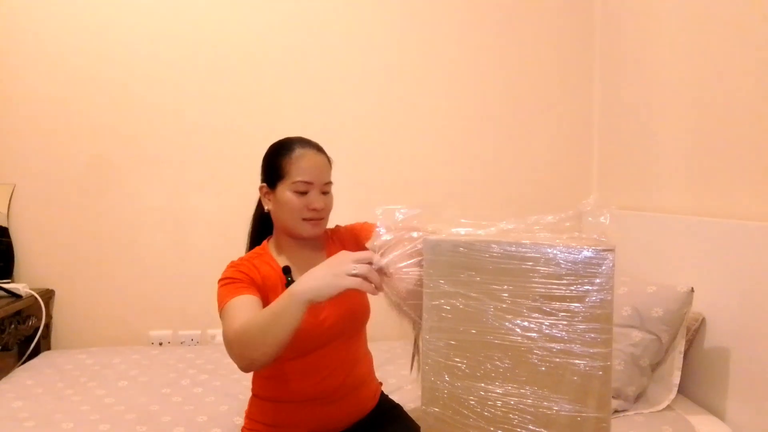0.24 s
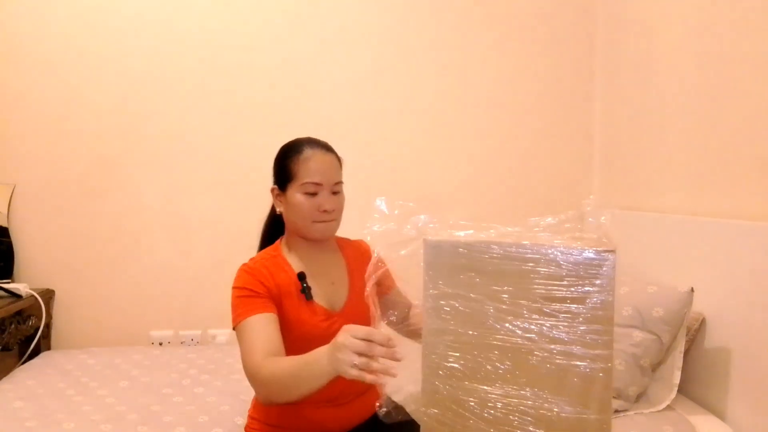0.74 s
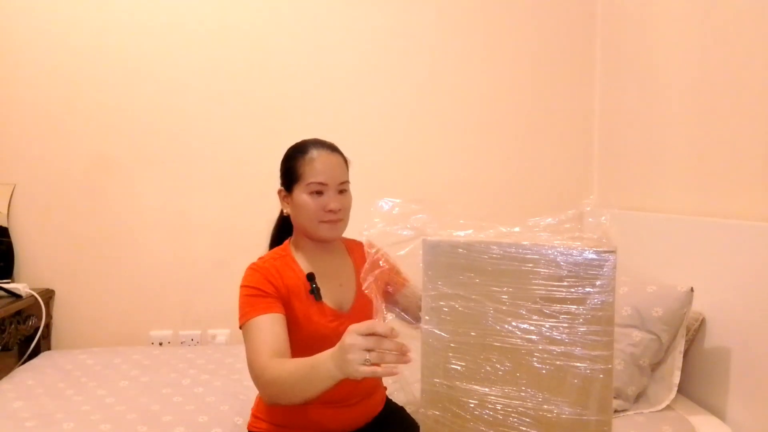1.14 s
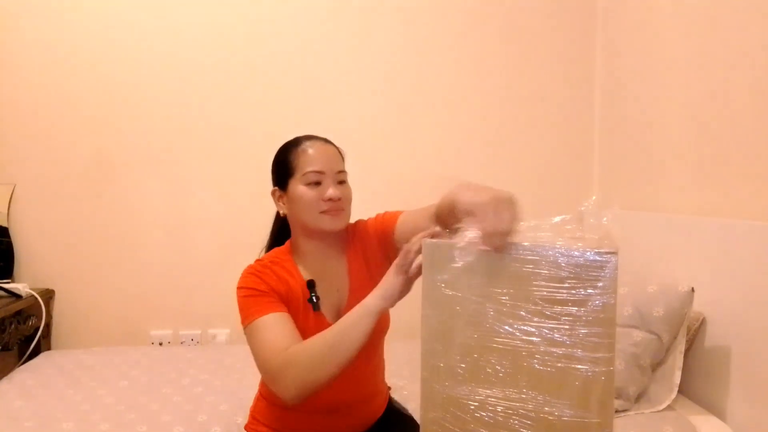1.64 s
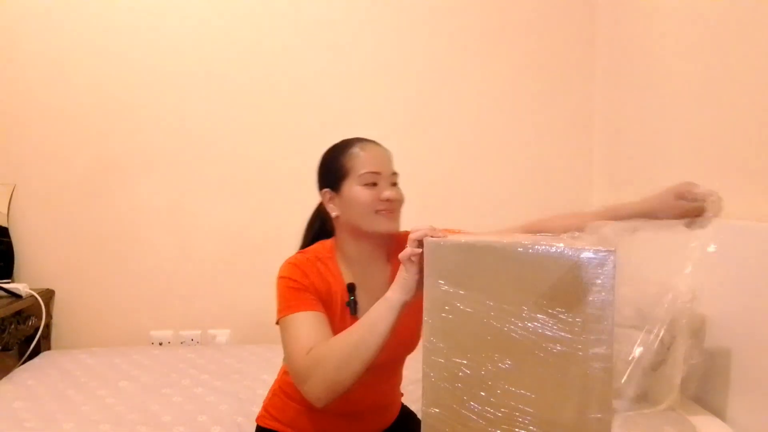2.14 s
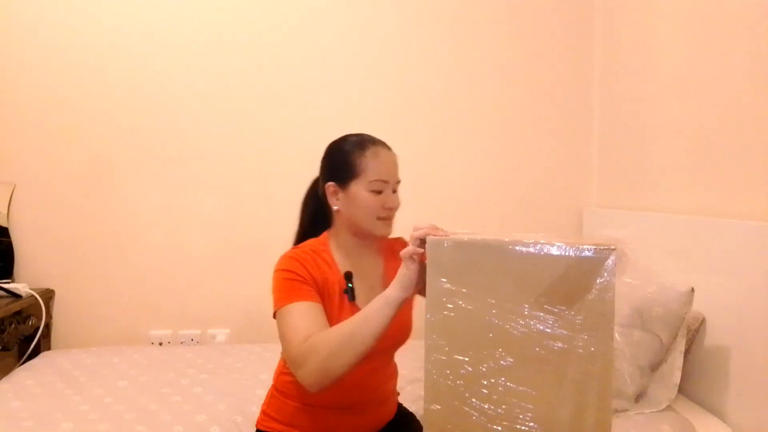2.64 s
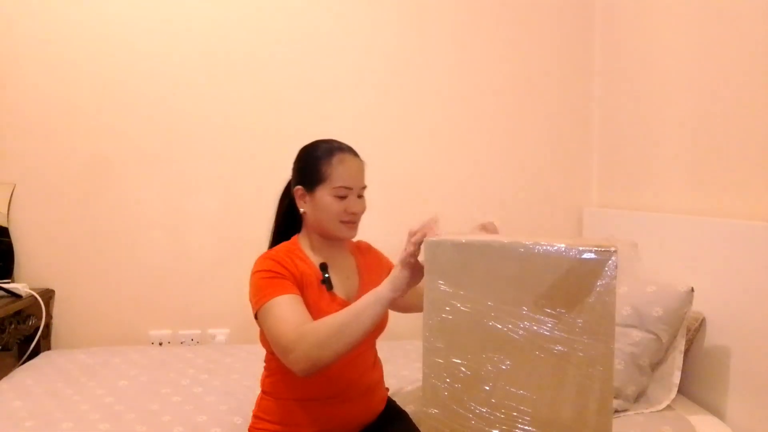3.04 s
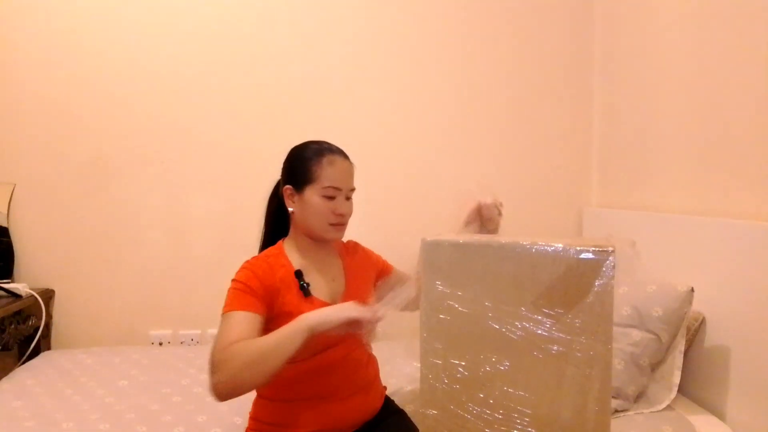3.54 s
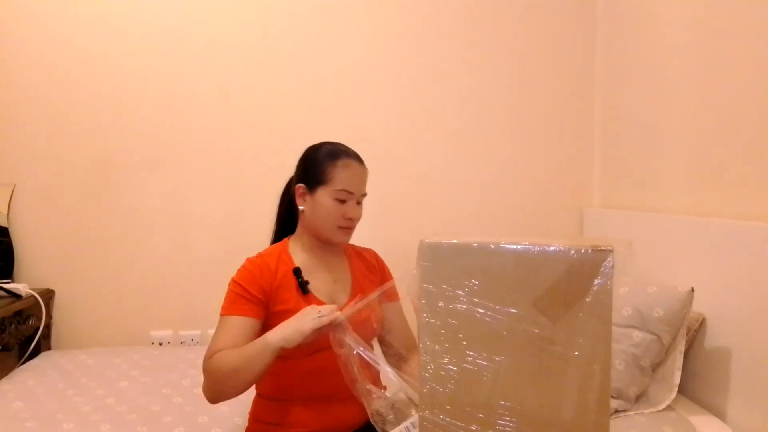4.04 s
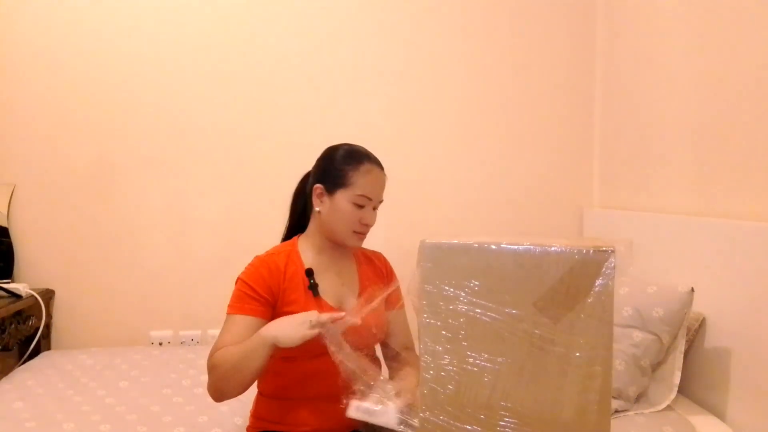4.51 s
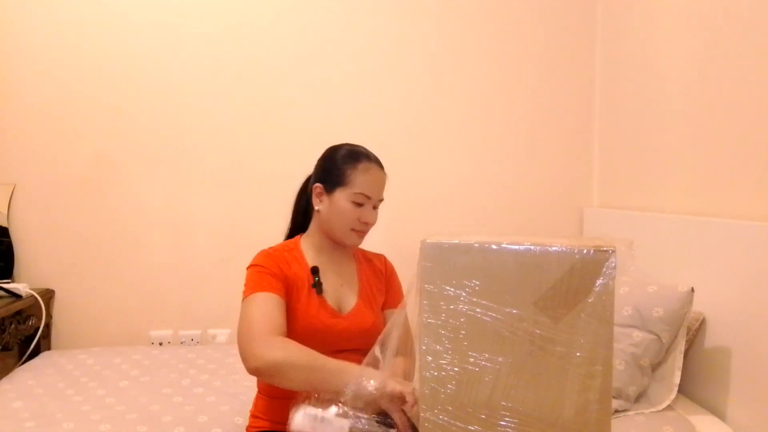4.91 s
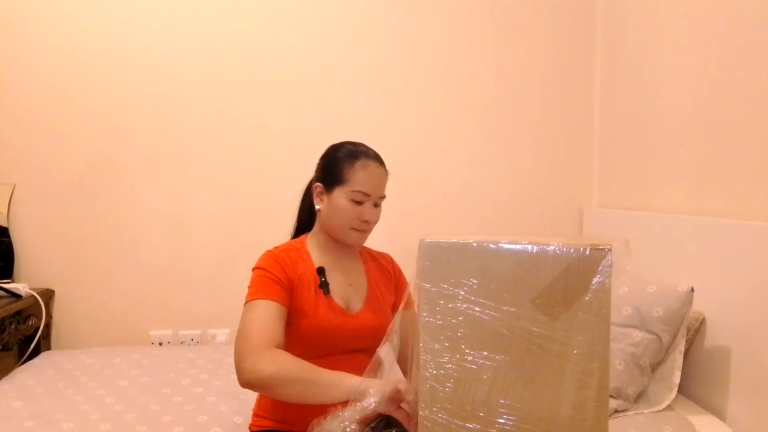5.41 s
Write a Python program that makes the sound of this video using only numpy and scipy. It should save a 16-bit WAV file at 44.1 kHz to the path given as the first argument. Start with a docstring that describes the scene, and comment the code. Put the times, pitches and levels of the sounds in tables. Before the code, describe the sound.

Close, dry crinkling of thin stretch wrap in irregular bursts, with one long rustling peel and lighter gathering rustles in a quiet small bedroom.

```python
"""Sharp crackling comes first, from short tugs at stretch wrap on a cardboard box in a small bedroom.
One long peel follows, then the loose film is gathered and pushed down beside the box.
Random noise grains make the tiny creases, filtered by the resonances of the sheet in each grip.
Big creases snap and ring, taut film drives the box like a drum skin, and hands knock on the cardboard.
Reflections and a faint hush place it all in the room, heard by a close clip-on mono microphone."""
import sys
import numpy as np
from scipy import signal
from scipy.fft import rfft, irfft, next_fast_len
from scipy.io import wavfile
from scipy.ndimage import uniform_filter1d

SR = 44100
rng = np.random.default_rng(int(sys.argv[2]) if len(sys.argv) > 2 else 0)


def persist_wave(psi):
    """Save psi, clipped to +-1, as 16-bit WAV."""
    counts = np.round(np.clip(psi, -1, 1) * 32767).astype(np.int16)
    wavfile.write(sys.argv[1], SR, np.atleast_2d(counts).T)


N = 249853
TIME = np.arange(N) / SR  # seconds

# Resonances of the plastic sheet, one table for each way of holding it: f/Hz, relative level/dB
LIFTED = [(24, -53.5), (40, -32.5), (117, -25.5), (158, -22.5), (213, -26), (253, -21.5), (509, -19.5),
          (1160, -5), (1640, -6.5), (4130, -4.5), (6010, -3), (8730, 8), (14000, -4), (15500, -12)]
TUGGED = [(24, -45.5), (40, -31), (154, -9), (224, -14), (273, -27.5), (350, -15.5), (484, -12), (670, 4.5),
          (740, -0.5), (1190, 1), (1380, -3.5), (2770, 0.5), (4680, -14), (9180, 14), (15500, -6.5)]
DANGLING = [(59, -62), (100, -29), (258, -50), (682, -28), (727, -12), (998, -3.5), (1340, -16),
            (1520, -16.5), (2690, -11), (3120, -21), (6120, -20.5), (9540, 1.5), (12800, -28), (14500, -11),
            (15500, -47)]
STRETCHED = [(24, -64.5), (40, -28.5), (103, -16.5), (183, -12.5), (438, -9), (704, 0.5), (1280, -11.5),
             (1410, -16), (2710, -15.5), (3220, -19), (5580, -15.5), (6810, -3.5), (7910, -12.5),
             (9180, -4), (15500, -22.5)]
PEELING = [(24, -41), (40, -28.5), (114, -25.5), (170, -18), (535, -6.5), (973, -0.5), (2770, -7.5),
           (7160, -7), (7910, -13), (9410, -1), (11800, -14), (14400, -18.5), (15500, -15)]
TEARING_FREE = [(24, -50.5), (40, -23), (136, -17), (213, -12.5), (472, -10), (562, -5), (653, 2), (998, 5),
                (2160, -11), (2710, -5), (4680, -9), (6640, -1.5), (9650, -2.5), (15500, -19)]
FLICKED = [(100, -33.5), (330, -21), (550, -29), (920, -10), (1200, -21), (1900, -18.5), (2500, -8.5),
           (3200, -5.5), (3750, -24), (4500, -11), (5100, 0.5), (6000, -1), (7300, 10.5), (7900, -4),
           (10000, 6.5), (12500, -8), (14000, 1), (15500, -23)]
SLACK = [(59, -82.5), (100, -54), (248, -44), (601, -14), (712, -26), (936, -15.5), (1400, -25.5),
         (2130, 8), (2470, 6.5), (3610, 3.5), (5400, 4), (6660, -18.5), (7560, -10), (10200, -6.5),
         (15500, -21)]
SHAKEN = [(59, -42), (100, -20), (258, -16.5), (457, -8.5), (576, -21.5), (727, -8), (1230, -19),
          (1620, -2), (1840, -11), (2630, 1), (3690, -3), (5070, 3), (6120, -8.5), (10600, -3),
          (15500, -12)]
FOLDED = [(59, -80.5), (100, -59.5), (808, -6.5), (1130, -4), (1880, 2), (3250, -16.5), (3930, -3),
          (4460, -26.5), (8230, -28), (9150, -31.5), (10200, -23.5), (14500, -43), (15500, -39.5)]
CRUMPLED = [(35, -58.5), (60, -29.5), (351, -17.5), (385, -16), (509, -13), (721, -14), (1200, -11.5),
            (1450, -5.5), (1630, -9), (2200, -5), (3270, -9), (4220, -7), (7900, -4), (9740, 1),
            (15500, -16.5)]
PRESSED = [(35, -70), (60, -41), (175, -6), (546, -29), (738, -9), (1420, -17), (1740, -36), (2530, -8.5),
           (3930, -17.5), (4850, 0.5), (6120, -14), (7200, -0.5), (12300, -9.5), (14500, -10), (15500, -11)]
# Grips, one after another: start t/s, resonances, creases per second [1/s],
# spread of crease sizes [dB], box level/dB relative to the sheet that drives it
GRIPS = [(0, LIFTED, 2700, 3, -19.5), (.7, TUGGED, 2600, 0.5, -9), (.89, DANGLING, 1470, 5, -20.5),
         (1.311, TUGGED, 1200, 1.5, -27.5), (1.45, STRETCHED, 2500, 3.5, -14),
         (1.701, PEELING, 3600, 0.5, -10.5), (2.52, TEARING_FREE, 3700, 2, -10.5),
         (3.2, FLICKED, 1600, 3.5, -8.5), (3.6, SLACK, 2600, 0, -15), (4.101, SHAKEN, 1900, 1.5, -4.5),
         (4.57, FOLDED, 2250, 3.5, -20), (4.7, CRUMPLED, 2700, 2, -11.5), (5.17, PRESSED, 1700, 3, -15)]
# Pitch ranges of fine creases, broad wrinkles, taut sheet and box: low edge f/Hz, high edge f/Hz
ZONES_HZ = [(6000, 20000), (1600, 6000), (450, 1600), (15, 450)]


def rustle(motion, regrip_s=.02):
    """Creases sound through the held sheet; each scale of film follows the pull, the box the taut sheet."""
    fine, wrinkles, taut = motion * undb([-1, -.5, -1])[:, None]
    ends = [grip[0] for grip in GRIPS[1:]] + [N / SR + regrip_s]
    out = np.zeros(N)
    for (start, resonances, rate, spread_db, box_db), end in zip(GRIPS, ends):
        now = (TIME > start - regrip_s) & (TIME < end + regrip_s)
        t = TIME[now]
        # neighbouring grips crossfade at equal power
        to_edge_s = np.minimum(t - start, end - t)
        held = np.sqrt(np.clip(.5 + to_edge_s / (2 * regrip_s), 0, 1))
        sheet = colour(creases(len(t), rate, spread_db), resonances)
        sheet = tighten(folds(sheet), t)
        gains = fine[now], wrinkles[now], taut[now], taut[now] * undb(box_db)
        layers = [steady(zone(sheet, *edges)) * gain for edges, gain in zip(ZONES_HZ, gains)]
        add(out, t[0], held * sum(layers))
    return out


def creases(n, rate, spread_db, ring_s=0.0059, ring_cycles=2.2, own_db=3.5, even_s=0.042):
    """Creases buckle at random; each has its own size and favours some pitches, and low ones ring longer."""
    chance = rng.random((n, 2))
    at = np.flatnonzero(chance[:, 0] < rate / SR)
    size_db = -spread_db * np.log(chance[at, 1] + 1e-3)
    edges = np.geomspace(250, 16000, 10)  # Hz
    out = np.zeros(n)
    for lo, hi in zip([20, *edges[:-1]], edges):
        kicks = np.zeros(n)
        pitch_db = own_db * rng.standard_normal(n)[at]
        kicks[at] = undb(size_db + pitch_db) ** 2
        # each kick leaves energy that dies away
        keep = np.exp(-2 / (SR * (ring_s + ring_cycles / hi)))
        energy = signal.lfilter([1 - keep], [1, -keep], kicks) + 1e-9
        # the hand feeds in energy steadily: a big crease relieves its neighbours
        energy /= uniform_filter1d(energy, int(even_s * SR)) + 1e-9
        out += band(np.sqrt(energy) * rng.standard_normal(n), lo, hi, order=3)
    return out


def folds(x):
    """Nearby folds mirror the sound a moment later; as they move, the colour ripples."""
    t, out = TIME[:len(x)], x.copy()
    knots = np.arange(0, t[-1] + .3, .15)  # seconds
    for lag_s in (.0005, .0011, .0019):
        lag = lag_s * np.exp(np.interp(t, knots, .12 * rng.standard_normal(len(knots))))
        share = np.interp(t, knots, .22 * rng.standard_normal(len(knots)))
        out += share * np.interp(t - lag, t, x)
    return out


# Small patches of film that tighten and ring: start t/s, lasting t/s, f/Hz, width f/Hz, boost level/dB
PATCHES = [(.33, 0.35, 1090, 130, 5.5), (.62, .15, 1030, 110, 15), (.41, 0.2, 10100, 810, 11),
           (.62, 0.18, 7100, 480, 13), (.9, .41, 2740, 130, 11), (1.0, 0.26, 1890, 90, 13),
           (1.52, 0.18, 1150, 350, 8), (2.77, .39, 3030, 445, 0.5), (3.03, 0.11, 7520, 1500, 11),
           (3.62, 0.064, 14200, 1800, 12), (3.768, 0.086, 7500, 560, 13.5), (3.77, 0.048, 5150, 450, 9.5),
           (3.68, 0.062, 2230, 300, 7), (3.94, 0.17, 4200, 400, 9), (4.07, 0.23, 3240, 170, 18),
           (4.45, 0.18, 2680, 248, 11.5), (4.58, 0.069, 1900, 397, 7.5), (4.69, 0.13, 4350, 450, 10.5),
           (4.84, 0.072, 2300, 248, 7), (4.83, 0.12, 9900, 550, 9.5), (5.111, 0.073, 7500, 597, 13),
           (5.39, 0.11, 7150, 700, 5)]


def tighten(x, t, fade_s=0.011):
    """A tight patch lifts one resonance out of the creases that run through it."""
    out = x.copy()
    for start, lasting, hz, width, boost_db in PATCHES:
        taut = np.clip(np.minimum(t - start, start + lasting - t) / fade_s, 0, 1)
        if taut.any():
            resonance = signal.lfilter(*signal.iirpeak(hz, hz / width, fs=SR), x)
            out += taut * (undb(boost_db) - 1) * resonance
    return out


def zone(x, lo, hi):
    """One of several bands with soft edges; where neighbours meet they add up smoothly."""
    size = next_fast_len(len(x) + SR // 20)
    hz = np.arange(size // 2 + 1) * SR / size

    def below(edge):
        """Let through what lies below the edge."""
        return 1 / (1 + (hz / edge) ** 10)

    return irfft(rfft(x, size) * (below(hi) - below(lo)), size)[:len(x)]


def steady(x, span_s=0.066):
    """Even out the slow level to about rms 1 and keep the fast grain."""
    return x / np.sqrt(np.abs(uniform_filter1d(x ** 2, int(span_s * SR))) + 1e-20)


# Short tugs and squeezes: taut at t/s, rise t/s (time to climb 20 dB), held t/s,
# fine crackle level/dB, and relative to it: broad wrinkles level/dB, taut sheet level/dB
TUGS = [(0.0, .02, 0.032, -21.5, -7, -14.5), (.14, 0.075, 0.054, -18.5, -7, -14),
        (0.226, 0.025, .06, -20, -6, -11), (0.366, 0.12, 0.12, -22.5, -7, -8.5),
        (0.549, 0.12, 0.058, -35.5, -7, -8.5), (.725, 0.056, .03, -59.5, -15, -5),
        (0.791, 0.02, 0.018, -19.5, -5, -3.5), (0.924, 0.042, 0.0087, -41.5, -6.5, -21),
        (1.011, 0.018, 0.091, -47.5, -11.5, -15), (1.114, 0.012, 0.0081, -50.5, -3, -1),
        (1.36, 0.017, 0.017, -28, -9.5, -9), (1.516, 0.042, 0.05, -24.5, -6, -1.5),
        (1.57, 0.036, 0.088, -21.5, -4, -1), (3.3, .09, .04, -56.5, -3.5, -16.5),
        (3.356, 0.02, 0.065, -31, -6, -25), (3.451, 0.032, 0.098, -25.5, 2, -19.5),
        (3.645, 0.085, 0.041, -39, -3, -24.5), (3.72, 0.019, .11, -39.5, 4, -17),
        (3.93, 0.045, 0.073, -42.5, 8, -16), (4.114, 0.042, 0.036, -65.5, 9.5, 6),
        (4.2, .08, .045, -67.5, 4, -7), (4.305, 0.026, 0.019, -31, 4, -16),
        (4.365, 0.041, 0.024, -32.5, 5.5, -9.5), (4.44, .04, 0.043, -42.5, -2.5, -9.5),
        (4.601, 0.017, .05, -48.5, 15.5, 10.5), (4.64, .02, 0.042, -34.5, 3, -7.5),
        (4.713, .025, 0.028, -23, 0, -11.5), (4.817, 0.0066, 0.12, -18.5, 0, -12.5),
        (4.855, .04, .01, -10, -12.5, -19), (4.97, 0.066, 0.055, -36.5, 8, -6),
        (5.049, .03, .015, -29, 0, -12.5), (5.47, 0.048, .02, -29, -18, -21),
        (5.531, 0.029, 0.038, -19, -4, -15), (5.61, 0.014, 0.011, -29, 0, -16)]
# The long peel across the top of the box: t/s, fine crackle level/dB,
# and relative to it: broad wrinkles level/dB, taut sheet level/dB
PEEL = [(1.68, -27, -2.5, -6.5), (1.762, -30.5, -12, -10), (1.798, -21.5, -11, -11),
        (2.224, -26, -7.5, -13), (2.32, -23, -3.5, -6.5), (2.462, -38, -3.5, -11.5),
        (2.632, -18.5, -4, -6.5), (2.692, -33, -0.5, -9.5), (2.728, -14, -2, -1.5), (2.74, -27, -0.5, -2.5),
        (2.798, -24, 1, -8), (2.984, -28, -0.5, -4.5), (3.072, -36.5, 4.5, -12.5), (3.1, -43, 3.5, -19)]
# Film lying in the hands, one level/dB each: fine crackle, broad wrinkles, taut sheet
REST_DB = [-68.5, -74.5, -79]


def pull(sag_db_per_s=27, peel_rise_s=0.051):
    """How strongly creases, wrinkles and taut sheet move: powers add, and a held tug slackens slowly."""
    power = undb(REST_DB)[:, None] ** 2 + np.zeros(N)
    for s, rise_s, held_s, db, wrinkle_db, sheet_db in TUGS:
        sag_db = sag_db_per_s * np.clip(TIME - s, 0, held_s)
        tug = swell(s, rise_s, s + held_s) * undb(db - sag_db)
        power += (undb([0, wrinkle_db, sheet_db])[:, None] * tug) ** 2
    s, *columns = np.transpose(PEEL)
    db, wrinkle_db, sheet_db = (np.interp(TIME, s, column) for column in columns)
    peel = swell(s[0], peel_rise_s, s[-1]) * undb([db, db + wrinkle_db, db + sheet_db])
    return np.sqrt(power + peel ** 2)


def swell(taut_s, rise_s, slack_s, release_db_per_s=379, settle_db=-24, settle_db_per_s=126.5):
    """A movement rises 20 dB per rise time, holds, drops fast, then the let-go film keeps unfolding."""
    early, late = np.maximum(taut_s - TIME, 0), np.maximum(TIME - slack_s, 0)
    release = np.maximum(undb(-release_db_per_s * late), undb(settle_db - settle_db_per_s * late))
    return undb(-20 * early / max(rise_s, 1e-3)) * release


# Big creases letting go: t/s, level/dB, ring f/Hz
SNAPS = [(0.015, -15.5, 9300), (.0854, -15.5, 8800), (.0892, -11.5, 8600), (0.1096, -15, 9000),
         (0.144, -13, 7800), (0.1531, -8.5, 8360), (0.1628, -13, 8800), (0.2178, -9, 8460),
         (0.2328, -14, 4220), (0.2434, -9, 9400), (.263, -13, 9200), (0.3642, -13, 9700),
         (0.375, -14, 9000), (.92, -30.5, 9600), (1.013, -39.5, 9000), (1.1149, -35, 9840),
         (1.216, -61, 1096), (1.5234, -11, 9300), (1.5715, -9.5, 1280), (1.8006, -16, 9800),
         (2.621, -22.5, 1100), (2.7136, -10, 6500), (2.7268, -11.5, 6600), (2.7765, -9.5, 2510),
         (3.17, -52, 9600), (3.2447, -54.5, 6900), (3.3579, -16.5, 7100), (3.4472, -13, 5460),
         (3.4866, -16, 6600), (3.5175, -14, 5430), (3.5411, -17.5, 5640), (3.7188, -23.5, 2700),
         (3.9051, -30, 4100), (3.929, -23.5, 2500), (4.295, -27, 3070), (4.3622, -23, 2700),
         (4.4585, -32.5, 9900), (4.5986, -24, 2080), (4.6929, -13, 3950), (4.714, -21, 5000),
         (4.7345, -16.5, 4270), (4.815, -10, 4950), (5.0573, -19, 4870), (5.2007, -44.5, 4520),
         (5.4035, -43.5, 11400), (5.5195, -19, 7150), (5.607, -18, 9500)]


def snaps(motion, ring_db=1, body_db=-8, ring_ratio=1.11, rise_s=0.00011, decay_s=0.0011,
          body_decay_s=0.004, follower_db=-7, follower_gap_s=.005):
    """A big crease cracks, rings and sets off a neighbour; relatively tauter film gives more body."""
    out = np.zeros(N)
    for s, db, hz in SNAPS:
        resonances = [grip[1] for grip in GRIPS if grip[0] <= s][-1]
        fine, _, taut = motion[:, int(s * SR)]
        follower_lag_s = follower_gap_s * (.5 + rng.random())
        for lag_s, drop_db in (0, 0), (follower_lag_s, follower_db):
            crack = unit(colour(burst(decay_s, rise_s), resonances))
            ring = unit(band(burst(decay_s, rise_s), hz / ring_ratio, hz * ring_ratio, order=2))
            body = unit(band(burst(body_decay_s, rise_s), 450, 1700, order=2))
            snap = crack + undb(ring_db) * ring + undb(body_db) * min(taut / fine, 1) * body
            # the level is set by the first instant of the snap
            add(out, s + lag_s, snap * undb(db + drop_db) / np.std(snap[:SR // 600]))
    return out


# Soft knocks of hands on the cardboard: t/s, relative level/dB
BUMPS = [(.24, -22.5), (1.573, -16), (2.62, -20), (2.726, -15.5), (4.107, -41.5), (4.81, -27.5),
         (5.194, -55.5), (5.22, -53), (5.263, -56.5), (5.403, -46), (5.458, -31.5)]
# How the cardboard colours a knock: f/Hz, relative level/dB
CARDBOARD = [(35, -9), (110, -9), (220, 5.5), (500, 0.5), (1000, -13), (2500, -42.5)]


def bumps(bump_db=-9):
    """Fingers land on the cardboard: short noise bursts filtered into a dull, dead knock."""
    out = np.zeros(N)
    for s, level_db in BUMPS:
        knock = colour(burst(.006, .0015), CARDBOARD)
        add(out, s, knock * undb(level_db + bump_db) / np.std(knock[:SR // 100]))
    return out


def bedroom(x, wet_db, t60_s=0.28, treble_t60_s=0.32, first_s=0.0033):
    """Near walls answer at once; the rest and the treble each take their t60 to fade by 60 dB."""
    t = TIME[:SR // 2]
    noise = rng.standard_normal(len(t)) * (t > first_s)
    tail = band(noise, 60, 5000, order=2) * undb(-60 * t / t60_s)
    tail += band(noise, 5000, 18000, order=2) * undb(-60 * t / treble_t60_s)
    return x + undb(wet_db) * signal.fftconvolve(x, tail / np.linalg.norm(tail))[:N]


# Colour of the quiet room: f/Hz, relative level/dB
QUIET = [(15, -24), (25, 2), (344, -12.5), (2300, -16.5), (2780, -16), (4040, -29), (9520, -21),
         (15000, -36)]


def room_tone(tone_db=-76):
    """The faint hush of the room: steady noise filtered to its colour."""
    return undb(tone_db) * unit(colour(rng.standard_normal(N), QUIET))


def burst(decay_s, rise_s):
    """A short burst of noise that rises and dies away."""
    t = TIME[:SR // 8]
    return (1 - np.exp(-t / rise_s)) * np.exp(-t / decay_s) * rng.standard_normal(len(t))


def colour(x, points):
    """Filter to a given spectrum without sound before the event (minimum phase, from the cepstrum)."""
    size = 1024
    cepstrum = irfft(np.log(gain_at(np.arange(size // 2 + 1) * SR / size, points)))
    # fold the backward half onto the forward half
    cepstrum[1:size // 2] *= 2
    cepstrum[size // 2 + 1:] = 0
    return signal.fftconvolve(x, irfft(np.exp(rfft(cepstrum))))[:len(x)]


def gain_at(hz, points):
    """Gain at the given frequencies, read from a table of f/Hz and level/dB."""
    f, db = np.transpose(points)
    return undb(np.interp(np.log(hz + 1), np.log(f), db))


def band(x, lo, hi, order):
    """Keep the pitches between two edges in Hz (Butterworth band-pass)."""
    return signal.sosfilt(signal.butter(order, [lo, hi], "band", fs=SR, output="sos"), x)


def undb(db):
    """Decibels to gain."""
    return 10 ** (np.asarray(db) / 20)


def unit(x):
    """Scale to rms 1."""
    return x / np.sqrt(np.mean(x ** 2) + 1e-30)


def add(out, s, x):
    """Mix x into out from time s in seconds."""
    i = max(int(s * SR), 0)
    out[i:i + len(x)] += x[:max(len(out) - i, 0)]


def scene():
    """Film, box and room reach one microphone, heard alike on both channels."""
    motion = pull()
    crinkle = bedroom(rustle(motion), wet_db=-11.5, t60_s=0.14, treble_t60_s=0.13)
    hits = bedroom(snaps(motion) + bumps(), wet_db=-9)
    mono = crinkle + hits + room_tone()
    return np.array([mono, mono])


def record(dry):
    """An overloaded microphone flattens peaks beyond 0.8; a steep filter cuts the top above 15.7 kHz."""
    top_cut = signal.ellip(10, .2, 80, 15700, fs=SR, output="sos")
    return signal.sosfilt(top_cut, np.clip(dry, -.8, .8))


dry = scene()
out = record(dry)
persist_wave(out)
```